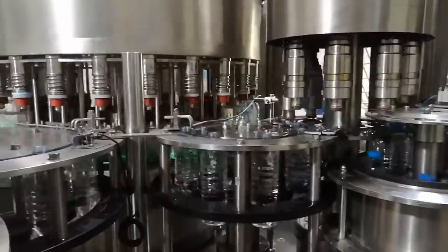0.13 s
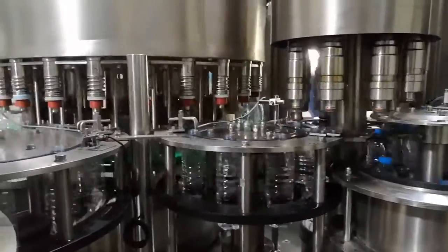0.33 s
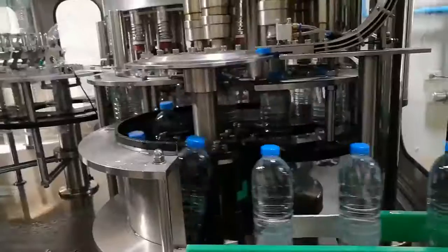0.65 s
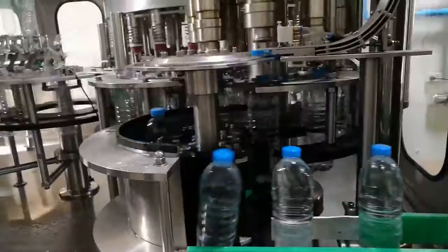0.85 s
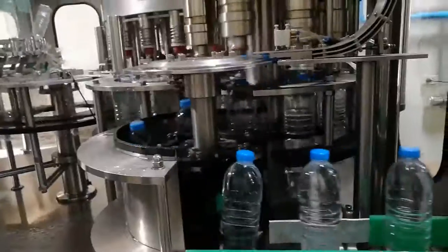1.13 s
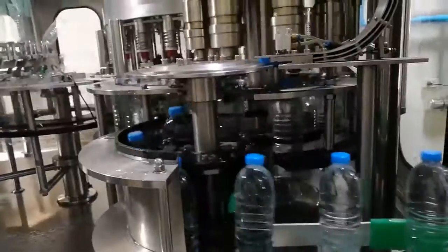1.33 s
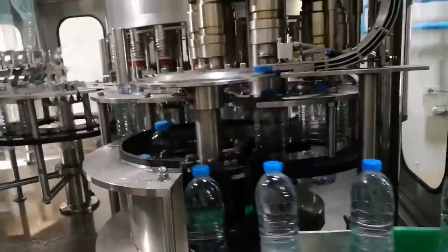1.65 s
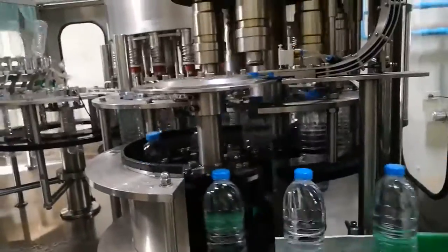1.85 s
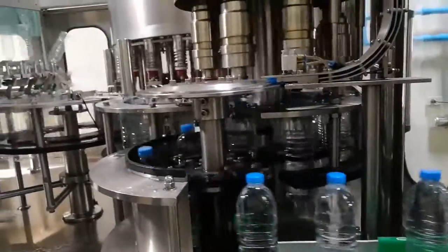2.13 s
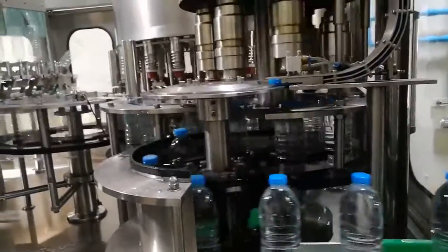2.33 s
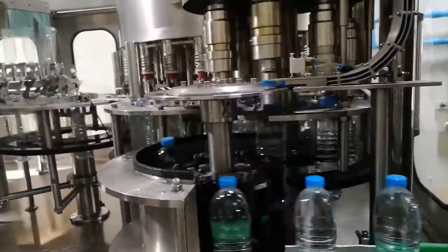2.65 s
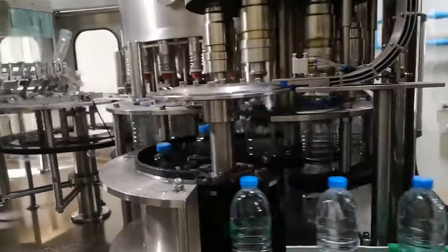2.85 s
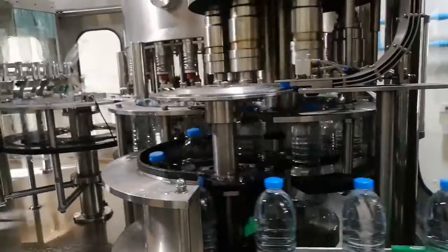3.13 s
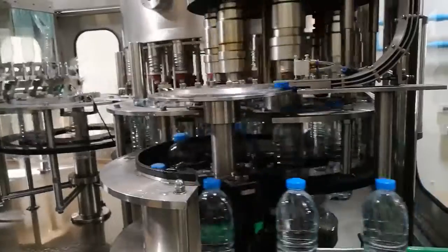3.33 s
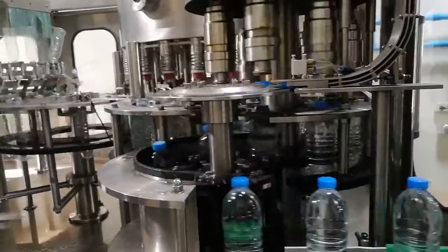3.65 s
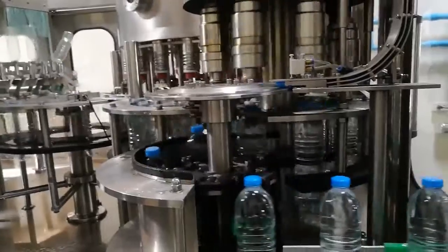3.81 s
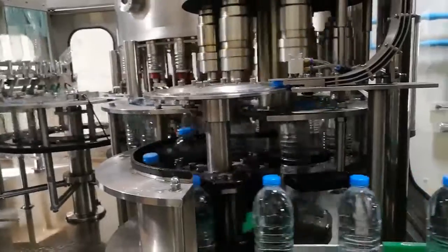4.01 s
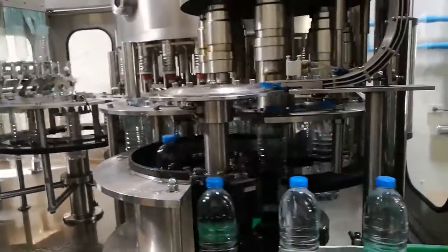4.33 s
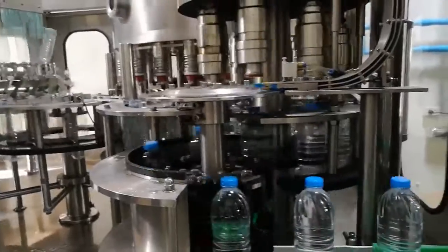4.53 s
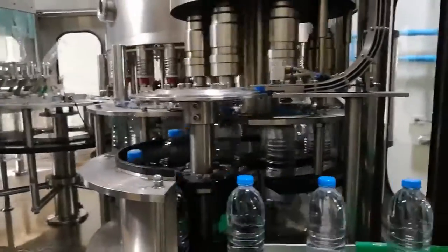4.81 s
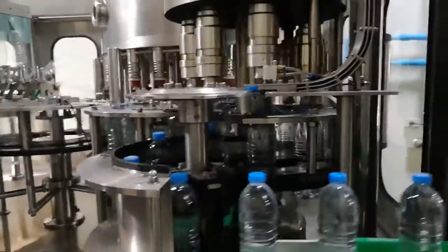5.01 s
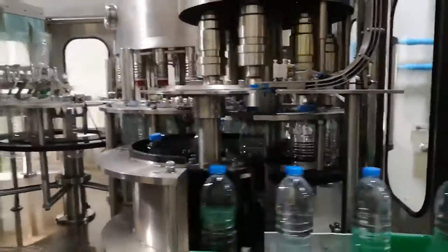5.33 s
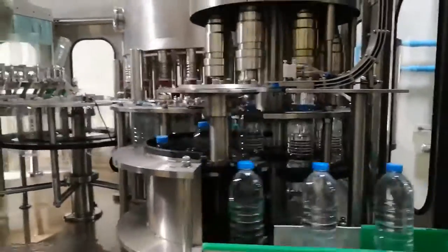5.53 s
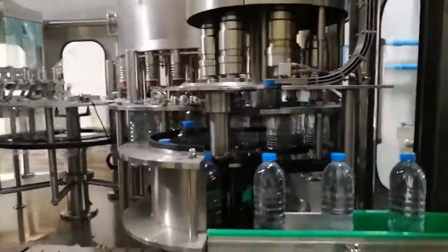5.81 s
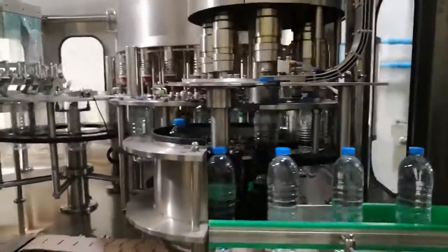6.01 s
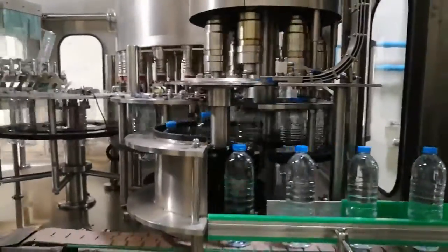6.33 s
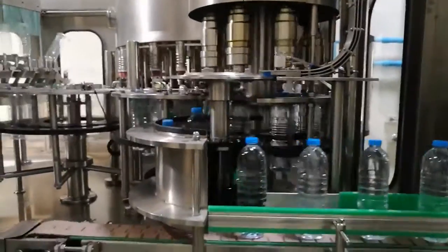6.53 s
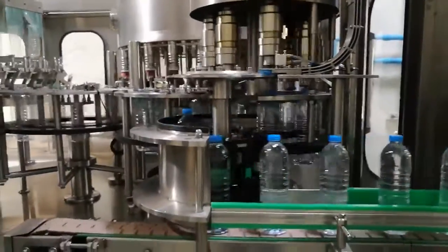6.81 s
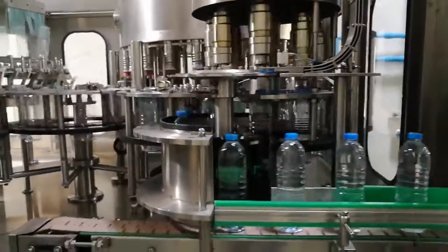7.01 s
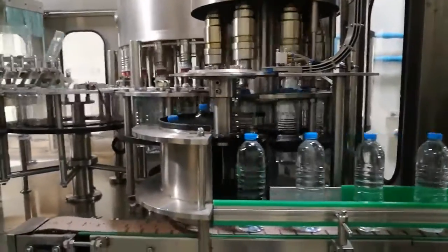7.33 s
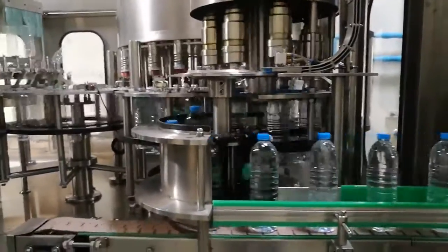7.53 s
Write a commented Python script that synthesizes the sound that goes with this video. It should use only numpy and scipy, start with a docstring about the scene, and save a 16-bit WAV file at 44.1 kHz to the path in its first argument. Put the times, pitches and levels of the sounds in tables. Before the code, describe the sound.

Steady factory bottling machinery: broad air hiss and low whir, metallic chatter and clacks, an early hard rattle, then a short dry squeal.

```python
"""Close by a rotary bottle filling and capping machine, inside its steel and glass enclosure, heard in stereo.
At the start the filler's steel rattles hardest beside the microphone, with near motor hum, clacks and a thin whine.
As these fade, the carousels whir on, bottles chatter along the guides and air hisses, sagging once per bottle.
From about 1.4 s a dry guide squeals for half a second; then a star wheel groans as it rubs, first in one long
moan, then twice more, lower. A few dull knocks come through the frame in the first four seconds."""
import sys
import numpy as np
from scipy import signal
from scipy.fft import rfft, irfft, next_fast_len
from scipy.io import wavfile

SR = 44100
rng = np.random.default_rng(int(sys.argv[2]) if len(sys.argv) > 2 else 0)


def dump_mix(stems):
    """Bounce the given channels to the path in sys.argv[1] as a 16-bit WAV at rate SR."""
    frames = np.atleast_2d(stems).T  # one column per channel
    limited = np.clip(frames, -1, 1)  # hard clip at full scale
    pcm = np.round(limited * 32767).astype(np.int16)
    wavfile.write(sys.argv[1], SR, pcm)


N = 337806
CUTOFF_HZ = 15850  # top of the sound
SHAFT_HZ = 48  # drive motor
# Table levels, pans and widths are nominal: the functions add trims, drifts and width factors.
# Left-right levels are positive toward the left.


def from_db(db):
    """Decibels to gain."""
    return 10 ** (np.asarray(db) / 20)


def rms_one(x):
    """Scale to unit rms."""
    return x / np.sqrt(np.mean(x ** 2) + 1e-20)


def in_time(rows):
    """Each column of a curve at every sample."""
    s, *columns = np.transpose(rows)
    return [np.interp(np.arange(N) / SR, s, c) for c in columns]


def at_hz(points, hz):
    """Read a table on a log-frequency axis."""
    known_hz, values = np.transpose(points)
    return np.interp(np.log(hz + 1e-9), np.log(known_hz), values)


def drift(rate):
    """Slow chance of spread 1, changing about rate times a second; made at every 40th sample."""
    r = np.exp(-80 * np.pi * rate / SR)
    noise = rng.standard_normal(N // 40 + 2002)
    slow = signal.lfilter([1], [1, -2 * r, r * r], noise)[2000:]
    return np.interp(np.arange(N) / 40, np.arange(len(slow)), rms_one(slow))


def panned(pan_db):
    """Left and right gains that give two unrelated channels of rms 1 a mid of rms 1."""
    gains = from_db(np.array([[.5], [-.5]]) * pan_db)
    return 2 * gains / np.sqrt(np.sum(gains ** 2, axis=0))


def resonance(x, hz, width_hz):
    """Two-pole resonance with gain about 1 on top."""
    r = np.exp(-np.pi * width_hz / SR)
    zeros = np.array([1, 0, -1]) * (1 - r * r) / 2
    return signal.lfilter(zeros, [1, -2 * r * np.cos(2 * np.pi * hz / SR), r * r], x)


def turns(hz):
    """Running phase of a moving frequency, in radians."""
    return 2 * np.pi * np.cumsum(hz) / SR


def narrow_band(x, hz, width_hz):
    """A steep resonance whose centre may move; rms 1."""
    carrier = np.exp(1j * turns(hz * np.ones(N)))
    narrow = signal.butter(2, width_hz / 2, fs=SR, output="sos")
    return rms_one(np.real(carrier * signal.sosfilt(narrow, x * carrier.conj())))


def swell(s, rise_s, fall_s):
    """A smooth rise to 1 at time s and a smooth fall after it."""
    age = np.arange(N) / SR - s
    return np.exp(-(age / np.where(age < 0, rise_s, fall_s)) ** 2)


# How alike the two microphone sides are: (frequency [Hz], left-right correlation [-1 to 1])
SIDE_LIKENESS = [(270, .998), (315, .85), (420, 0), (490, -.5), (580, -.5), (670, .05), (870, .55),
                 (1050, -.05), (1500, -.05), (1950, -.3), (2300, 0), (2800, .25), (3500, -.1), (7000, 0)]


def diffuse(spectrum, pan_table=None):
    """Stereo noise in the enclosure, alike in the bass and less so in the treble; mid rms 1."""
    size = next_fast_len(N)
    hz = np.fft.rfftfreq(size, 1 / SR)
    mid, side = rfft(rng.standard_normal((2, size)))
    alike = np.clip(at_hz(SIDE_LIKENESS, hz), -.9, .998)
    side = side * np.sqrt((1 - alike) / (1 + alike))
    pair = (mid + side * [[1], [-1]]) * from_db(at_hz(spectrum, hz))
    if pan_table:
        pair = pair * panned(at_hz(pan_table, hz))
    out = irfft(pair, size)[:, :N]
    return out / np.std(out.mean(axis=0))


def patchy(x, patchy_db, rate, count=14):
    """Let each of several evenly spaced bands swell and fade on its own."""
    size = next_fast_len(N)
    hz, spectrum = np.fft.rfftfreq(size, 1 / SR), rfft(x, size)
    centres = np.linspace(0, CUTOFF_HZ, count)
    out = 0
    for share in np.eye(count):
        level = from_db(patchy_db * drift(rate))
        out = out + level * irfft(spectrum * np.interp(hz, centres, share), size)[:, :N]
    return out


def contacts(per_s, spread_db):
    """Random small impacts of uneven size; each reaches the two sides with its own strength."""
    sizes = from_db(spread_db * np.minimum(rng.exponential(1, N), 4))
    return (rng.random(N) < per_s / SR) * sizes * rng.standard_normal((2, N))


# Brief dips of whir and chatter: (time [s], half-length [s], depth [dB])
BRIEF_LULLS = [(2.55, 0.046, 3.5), (2.857, 0.036, 4), (5.204, 0.057, 2.5), (5.52, 0.027, 4.6)]


def lull_db():
    """How far the whir and the guides' lower mode drop in their brief lulls."""
    return sum(depth_db * swell(s, half_s, half_s) for s, half_s, depth_db in BRIEF_LULLS)


# Whir of carousels and conveyor: (frequency [Hz], relative level [dB per Hz])
WHIR_SPECTRUM = [(15, -49), (25, -24.5), (156, -5.5), (205, -9.5), (236, -6.5), (268, -7), (299, -6.5),
                 (346, -12.5), (386, -7), (438, -16), (510, -21), (640, -17), (790, -10), (980, -10),
                 (1640, -9), (1770, -9), (1900, -10), (2470, -51), (4180, -120)]
# Its place between the sides: (frequency [Hz], left-right level [dB])
WHIR_SIDES = [(180, 0), (300, -.5), (400, -3), (560, -2.5), (820, 2), (1100, -4.5), (1700, -4)]
# Its strength: (time [s], level [dB])
WHIR_STRENGTH = [(0, -39), (.45, -39.5), (1.0, -41), (1.9, -42.5), (2.7, -40.5), (3.1, -41), (4.6, -41.5),
                 (5.7, -40.5), (6.9, -42), (7.66, -40)]


def whir():
    """Carousels and conveyor turn all around: broad low noise of uneven strength."""
    level_db, = in_time(WHIR_STRENGTH)
    level_db = level_db - lull_db() + 2.5 + 1.08 * drift(9.6)
    return from_db(level_db) * diffuse(WHIR_SPECTRUM, WHIR_SIDES)


# Conveyor's low drone: (time [s], level [dB])
BELT_STRENGTH = [(0, -51), (1.3, -54.5), (1.8, -58), (4.6, -70), (5.5, -55), (7.66, -51)]


def belt(hz=570, width_hz=240):
    """The conveyor drones: one low band of noise, unrelated on the two sides."""
    level_db, = in_time(BELT_STRENGTH)
    noise = rng.standard_normal((2, N))
    return from_db(level_db + 4.2 * drift(12)) * narrow_band(noise, hz, width_hz)


# Motor hum: (ratio to the shaft rate, level [dB rms])
HUM_RATIOS = [(1, -48), (3, -44.5), (7.6, -51.5), (10.77, -59)]
# Hum at the microphone: (time [s], level [dB])
HUM_STRENGTH = [(0, 2.5), (.52, -0.5), (.55, -17), (7.66, -22.5)]


def hum():
    """The drive motor hums at several fixed ratios, not all whole, to its slightly unsteady shaft rate."""
    near_db, = in_time(HUM_STRENGTH)
    shaft = turns(SHAFT_HZ * (1 + 0.005 * drift(5.5)))
    out = 0
    for ratio, db in HUM_RATIOS:
        gain = np.sqrt(2) * from_db(db + 1.5 * drift(6.6))
        out = out + gain * np.sin(ratio * shaft + rng.uniform(0, 2 * np.pi))
    return out * from_db(near_db)


# Droning panels: (frequency [Hz], width [Hz], level [dB rms])
PANEL_DRONES = [(240.7, 8.1, -54.5), (375, 5.3, -65.5), (783, 102, -54), (1137, 94, -51.5)]


def panel_drones():
    """Panels resonate in narrow bands, each swelling and fading slowly by chance, on its own."""
    out = 0
    for hz, width, db in PANEL_DRONES:
        level = from_db(db - 1.0 + 4.2 * np.tanh(drift(3.0)))
        out = out + level * narrow_band(rng.standard_normal(N), hz, 1.37 * width)
    return out


def drive():
    """Whir of the carousels, conveyor drone, motor hum and droning panels."""
    return whir() + belt() + hum() + panel_drones()


def bottle_sag(first_s=0.2, cycle_s=.882, half_s=0.082):
    """How far the air is drawn down, 0-1: once for each passing bottle."""
    return sum(swell(s, half_s, half_s) for s in np.arange(first_s, N / SR, cycle_s))


# Broad air hiss: (frequency [Hz], relative level [dB per Hz])
HISS_SPECTRUM = [(700, -49), (1400, -6.5), (1900, -5.5), (2700, 4), (3400, 2), (4400, 3), (5300, 0.5),
                 (6000, -1), (6900, -2), (8300, -2.5), (9400, -7), (11500, -8.5), (16000, -9)]
# Its place between the sides: (frequency [Hz], left-right level [dB])
HISS_SIDES = [(2000, -8.5), (3300, -2), (4400, -8), (6000, -6.5), (7000, -9), (8300, -5.5), (9600, -5),
              (12000, 3)]
# Its strength: (time [s], level [dB])
HISS_STRENGTH = [(0, -31), (.6, -31.5), (1.5, -31.5), (4.5, -33), (5.25, -31.5), (5.7, -34.5), (6.3, -32.5),
                 (7.66, -32.5)]


def hiss(sag, sag_db=0.2):
    """Escaping compressed air: broad turbulent noise that barely sags."""
    level_db, = in_time(HISS_STRENGTH)
    level_db = level_db - sag_db * sag - 1.0 + 0.94 * drift(12.0)
    return from_db(level_db) * diffuse(HISS_SPECTRUM, HISS_SIDES)


# Nozzle's hollow hiss: (time [s], level [dB])
NOZZLE_STRENGTH = [(0, -42.5), (.5, -40.5), (.6, -68), (1.35, -43.5), (4.2, -40.5), (5.5, -42.5),
                   (6.7, -40), (7.66, -41.5)]


def nozzle(sag, sag_db=3, hz=8400, width_hz=1160):
    """Air through a nozzle: a hollow band of noise, far to the right."""
    level_db, = in_time(NOZZLE_STRENGTH)
    level = from_db(level_db - sag_db * sag + 1.13 * drift(8.1))
    return level * narrow_band(rng.standard_normal((2, N)), hz, width_hz) * panned(pan_db=-20.0)


# Fine air jet: (frequency [Hz], relative level [dB per Hz])
JET_SPECTRUM = [(3000, -60), (8000, -3), (10200, 9.5), (11300, 4), (12800, 9.5), (13900, 11), (14800, 7),
                (15600, 8), (16500, 8)]
# Its strength and place: (time [s], level [dB], left-right level [dB])
JET_STRENGTH = [(0, -45.5, 1.2), (1.3, -41.5, 3), (2.6, -38.5, 3), (3.3, -37.5, 6.2), (4.35, -37, 3.3),
                (5.15, -38, .6), (5.6, -40.5, 1), (7.66, -41.5, 3)]


def jet(sag, sag_db=5):
    """A fine air jet: high noise whose treble flickers band by band."""
    level_db, pan_db = in_time(JET_STRENGTH)
    level = from_db(level_db - sag_db * sag + 1.85 + 0.8 * drift(17))
    noise = rms_one(patchy(diffuse(JET_SPECTRUM), patchy_db=2.5, rate=16))
    return level * noise * panned(pan_db - 0.5)


# Edge whistles: (frequency [Hz], width [Hz], relative level [dB], left-right level [dB])
WHISTLE_BANDS = [(4540, 750, -1.5, -14), (4890, 160, -5, -2), (5536, 185, 3.5, -17), (6055, 290, 0.5, -13),
                 (8010, 14, -6, -4), (9370, 270, -2.5, -16)]
# Their strength together: (time [s], level [dB])
WHISTLE_STRENGTH = [(0, -64), (1.5, -46), (2.1, -44.5), (2.55, -43), (3.1, -45.5), (3.55, -43),
                    (4.2, -43.5), (4.8, -43.5), (5.3, -52), (7.66, -57)]


def edge_whistles(sag, sag_db=6):
    """Air whistles faintly over edges: wavering narrow bands of noise."""
    level_db, = in_time(WHISTLE_STRENGTH)
    whistles = 0
    for hz, width, db, pan_db in WHISTLE_BANDS:
        waver = from_db(db + 1.8 * drift(14))
        band = narrow_band(rng.standard_normal((2, N)), hz, width)
        whistles = whistles + waver * band * panned(pan_db)
    return from_db(level_db - sag_db * sag + 7.5) * rms_one(whistles)


def air():
    """Broad hiss, hollow nozzle, fine jet and edge whistles; all sag with each bottle."""
    sag = bottle_sag()
    return hiss(sag) + nozzle(sag) + jet(sag) + edge_whistles(sag)


# Knocks through the frame: (time [s], level [dB], centre [Hz], decay [s])
FRAME_KNOCKS = [(.085, -33, 1200, .02), (1.395, -36, 1200, .02), (2.175, -36.5, 1200, .025),
                (2.735, -45, 900, .03), (3.13, -50, 55, .12), (3.742, -29.5, 1150, .015),
                (3.765, -39, 260, .02)]


def knocks(rise_s=0.0011):
    """Dull bumps, equal on both sides: resonant noise that dies away in the frame."""
    out = np.zeros(N)
    for s, db, hz, decay_s in FRAME_KNOCKS:
        age = np.maximum(np.arange(N) / SR - s, 0)
        width_hz = 0.78 * hz
        body = rms_one(resonance(resonance(rng.standard_normal(N), hz, width_hz), hz, width_hz))
        out += from_db(db) * body * (1 - np.exp(-age / rise_s)) * np.exp(-age / decay_s)
    return out


# Star wheel rubbing, the first two rows overlapping in one moan:
# (time of the peak [s], half-length [s], pitch at the peak [Hz], level [dB])
STAR_WHEEL_RUBS = [(2.47, 0.28, 316, -49), (2.724, 0.18, 311, -45), (3.657, 0.3, 292, -48),
                   (4.946, 0.35, 243, -47.5)]


def groan(width_hz=36, sag_hz_per_s=74):
    """A star wheel rubs: low, breathy notes that swell and sink in pitch."""
    t = np.arange(N) / SR
    out = 0
    for s, half_s, hz, db in STAR_WHEEL_RUBS:
        note = narrow_band(rng.standard_normal(N), hz - sag_hz_per_s * (t - s), width_hz)
        out = out + from_db(db) * swell(s, half_s, half_s) * note
    return out


# Whine beside the filler: (time [s], level [dB])
WHINE_STRENGTH = [(0, -44), (.22, -41), (.35, -44), (1.5, -53), (2.2, -80)]


def whine(hz=2590):
    """A thin whine beside the filler: one sine, slightly unsteady in pitch and level."""
    level_db, = in_time(WHINE_STRENGTH)
    return from_db(level_db + 2.7 * drift(12)) * np.sqrt(2) * np.sin(turns(hz + 4 * drift(8)))


# Squealing guide: (time [s], pitch [Hz], lead of the left side [turns])
SQUEAL_COURSE = [(1.42, 1780, .3), (1.54, 1779, .3), (1.67, 1788, .48), (1.75, 1788, .45), (1.82, 1793, .1),
                 (1.95, 1799, 0)]
# Its partials: (time [s], tone left [dB], tone right [dB], octave left [dB], octave right [dB],
# third partial [dB], fourth partial [dB])
SQUEAL_PARTIALS = [(1.37, -70, -70, -70, -70, -70, -70), (1.43, -34, -42, -39, -37, -50, -47),
                   (1.48, -29, -31, -45, -30.5, -39, -43), (1.54, -30, -27.5, -43, -31.5, -47, -41),
                   (1.6, -28, -30.5, -43, -36, -31.5, -36.5), (1.67, -29, -36, -45, -41, -40, -43),
                   (1.73, -29.5, -28.5, -40, -41, -40, -44), (1.79, -30.5, -34, -34.5, -39.5, -44, -44),
                   (1.86, -39, -23, -36.5, -31, -42, -44), (1.92, -38, -27.5, -50, -42, -41, -46),
                   (2.02, -80, -80, -80, -80, -80, -80)]


def squeal(left_side_tone_db=-14, right_side_tone_db=-9, waver_db=.8):
    """Stick-slip tone and overtones; shaft shake adds a side tone, standing waves swing it across."""
    hz, lead_turns = in_time(SQUEAL_COURSE)
    gains = from_db(in_time(SQUEAL_PARTIALS))
    phase = turns(hz * (1 + .0005 * drift(40)))
    lead = 2 * np.pi * lead_turns * np.array([[1], [0]])
    side_gains = from_db([[left_side_tone_db], [right_side_tone_db]])
    side_tone = side_gains * np.sin(phase + turns(np.full(N, SHAFT_HZ)))
    tone = gains[:2] * (np.sin(phase + lead) + side_tone)
    octave = gains[2:4] * np.sin(2 * phase + lead / 2)
    upper = gains[4] * np.sin(3 * phase) + gains[5] * np.sin(4 * phase)
    upper = upper * from_db([[-15], [0]])  # weaker on the left
    return np.sqrt(2) * sum(part * from_db(waver_db * drift(25)) for part in (tone, octave, upper))


# Bottles striking the guides: (time [s], level [dB], ring [Hz])
BOTTLE_CLACKS = [(.003, -26, 2250), (.088, -28, 2600), (.2, -28, 2550), (.385, -27.5, 2300),
                 (.413, -31, 2900), (.525, -30, 2550), (.585, -27, 2280), (.655, -30, 2260),
                 (.91, -29, 2300), (.928, -36, 2250), (1.042, -26, 2300), (2.118, -30, 2280),
                 (2.5, -32, 2250), (3.012, -29, 2050), (6.912, -31, 2160), (7.458, -31, 2210)]


def clacks(width_hz=300, rise_s=.002, decay_s=.011):
    """Single bottles strike the guides: a short, coarse ring of the steel."""
    out, age = np.zeros((2, N + SR)), np.arange(SR // 8) / SR
    shape = (1 - np.exp(-age / rise_s)) * np.exp(-age / decay_s)
    shape /= shape.max()
    for s, db, hz in BOTTLE_CLACKS:
        strike = rng.standard_normal((2, len(age))) * shape
        ring = resonance(resonance(strike, hz, width_hz), hz, 3 * width_hz)
        # give each side the energy of the bare shape
        ring *= np.linalg.norm(shape) / np.linalg.norm(ring, axis=1, keepdims=True)
        start = max(int(s * SR), 0)
        out[:, start:start + len(age)] += from_db(db) * ring
    return out[:, :N] * panned(pan_db=-11.0)


# Chatter of the capper's guides: (time [s], upper mode [dB], lower mode [dB])
CHATTER_STRENGTH = [(0, -31, -32), (.7, -37, -34), (1.4, -38.5, -34.5), (2.5, -40, -39), (3.3, -39, -33.5),
                    (4.5, -42, -37), (5.9, -39.5, -39), (7.2, -36.5, -37)]
# A bottle presses hard: (time [s], half-length [s], upper mode [dB], lower mode [dB])
BOTTLE_PRESSES = [(.96, 0.067, -36, -42), (2.127, 0.031, -34, -40), (3.042, 0.08, -40, -31.5),
                  (3.27, .16, -48, -36), (3.66, 0.13, -46, -40), (4.16, 0.14, -38, -42),
                  (5.1, 0.3, -45, -36.5), (6.72, .12, -39, -42)]
# The guides' upper and lower mode: (frequency [Hz], width [Hz])
GUIDE_RESONANCES = [(2270, 235), (2050, 320)]
# Upper mode, moved by the bottles pressing on it: (time [s], shift [Hz])
UPPER_GUIDE_SHIFT = [(0, 35), (1.1, 18), (1.9, 88), (2.15, 4), (4.2, 49), (4.8, -12), (6.6, -45),
                     (7.66, -17)]
# Lower mode: (time [s], shift [Hz], left-right level [dB])
LOWER_GUIDE_SHIFT = [(0, 62, -3), (2.7, 97, -8), (3.0, -18, -3.5), (3.3, 50, -4), (4.4, 20, -2),
                     (5.0, -110, -4), (5.4, -83, 1), (6.1, 10, 2), (7.66, 40, -6)]


def chatter(flutter_db=.6, flutter_hz=18, wander_hz=35):
    """Bottles chatter along the capper's guides: dense contacts ring two wandering modes."""
    upper_gain, lower_gain = from_db(in_time(CHATTER_STRENGTH))
    for s, half_s, upper_db, lower_db in BOTTLE_PRESSES:
        press = swell(s, half_s, half_s)
        upper_gain = np.hypot(upper_gain, from_db(upper_db) * press)
        lower_gain = np.hypot(lower_gain, from_db(lower_db) * press)
    shift_hz, = in_time(UPPER_GUIDE_SHIFT)
    lower_shift_hz, lower_pan_db = in_time(LOWER_GUIDE_SHIFT)
    (upper_hz, upper_width), (lower_hz, lower_width) = GUIDE_RESONANCES

    def sing(db, hz, width):
        """One mode, rung by dense contacts."""
        hits = contacts(per_s=2500, spread_db=1.5)
        level = from_db(db + flutter_db * drift(flutter_hz))
        return level * narrow_band(hits, hz + wander_hz * drift(9.3), width)

    upper = upper_gain * sing(-0.51, upper_hz + shift_hz, upper_width)
    lower = lower_gain * sing(-5.5 - lull_db(), lower_hz + lower_shift_hz, lower_width)
    return upper * panned(pan_db=-9.0) + lower * panned(lower_pan_db)


# Rattle at the filler: (time [s], level [dB], brightness [dB per octave])
RATTLE_STRENGTH = [(0, -30, -1), (.15, -31.5, -2), (.3, -31, -2), (.47, -30, -2), (.58, -38, 0),
                   (1.1, -38, 0), (1.4, -48, 0)]
# Its steel: (frequency [Hz], width [Hz], relative level [dB])
FILLER_STEEL = [(1820, 250, -17), (2260, 89, -7), (2576, 200, 0), (2946, 170, 0), (3195, 260, -1),
                (4470, 930, -1.8)]
# Harder rattling: (time [s], half-length [s], rise [dB])
HARD_BURSTS = [(.42, 0.055, 1), (0.922, 0.05, 2.5), (1.041, 0.037, 4.5)]


def rattle(end_s=1.4, fade_s=0.18, damping=0.52, hard_db=-28.5, flutter_db=1.5, wander_hz=60):
    """Valves and grippers rattle on the filler's steel, whose modes shift with the points of contact."""
    level_db, tilt_db = in_time(RATTLE_STRENGTH)
    level_db = level_db + sum(rise_db * swell(s, half_s, half_s) for s, half_s, rise_db in HARD_BURSTS)
    hits = contacts(per_s=2600, spread_db=0.0)
    middle_hz = np.median(np.array(FILLER_STEEL)[:, 0])
    steel = 0
    for hz, width, db in FILLER_STEEL:
        mode_db = db + tilt_db * np.log2(hz / middle_hz) + flutter_db * drift(30)
        steel = steel + from_db(mode_db) * narrow_band(hits, hz + wander_hz * drift(9), 0.98 * width)
    # light contact is damped further than hard contact
    force = from_db(level_db + damping * np.minimum(level_db - hard_db, 0))
    heard = np.clip((end_s - np.arange(N) / SR) / fade_s, 0, 1)
    return from_db(2.5) * force * heard * rms_one(steel) * panned(pan_db=-11.0)


def enclosure(x, echo_db=-16, sway_s=.00025, panel_hz=600, count=6):
    """Steel and glass echo the treble; the hand-held microphone sways, so the ripple wanders."""
    bright = signal.sosfilt(signal.butter(2, panel_hz, "high", fs=SR, output="sos"), x)
    out = x.copy()
    for side in range(2):
        for delay_s in np.geomspace(.0035, .016, count) * rng.uniform(.85, 1.15, count):
            lag = np.round((delay_s + sway_s * drift(0.32)) * SR).astype(int)
            echo = bright[side].take(np.arange(N) - lag, mode="wrap")
            out[side] += rng.choice([-1, 1]) * from_db(echo_db) * echo
    return out * np.std(x) / np.std(out)  # overall level unchanged


def scene():
    """The whole machine; whine, squeal, groans and knocks are heard without the panel echoes."""
    echoed = enclosure(drive() + air() + chatter() + rattle() + clacks())
    return echoed + whine() + squeal() + groan() + knocks()


def record(dry):
    """The top is cut steeply."""
    return signal.sosfilt(signal.ellip(12, .1, 80, CUTOFF_HZ, fs=SR, output="sos"), dry)


dry = scene()
out = record(dry)
dump_mix(out)
```